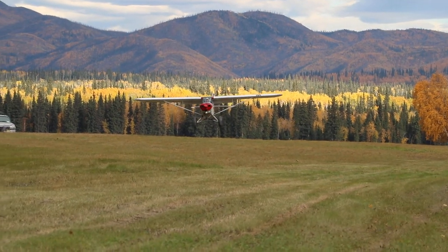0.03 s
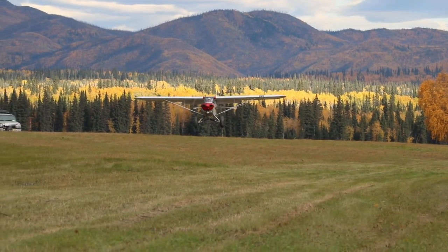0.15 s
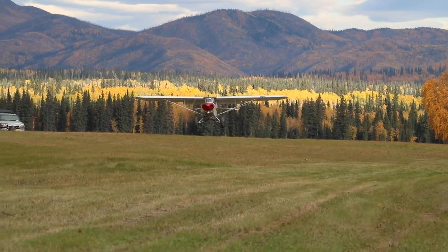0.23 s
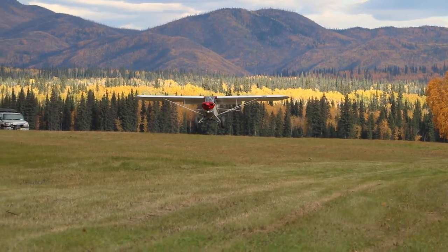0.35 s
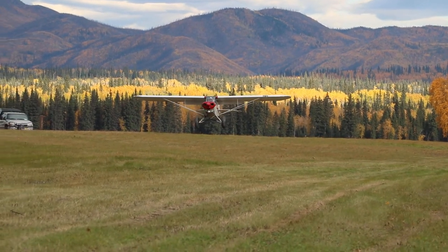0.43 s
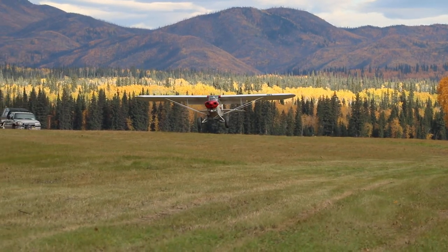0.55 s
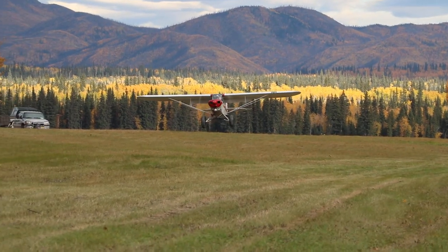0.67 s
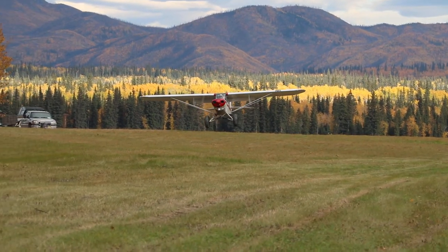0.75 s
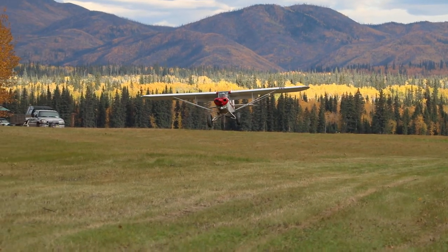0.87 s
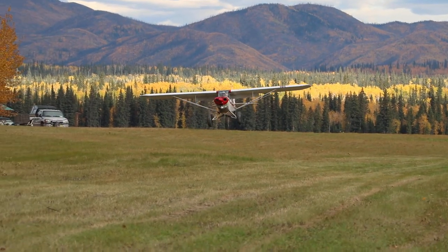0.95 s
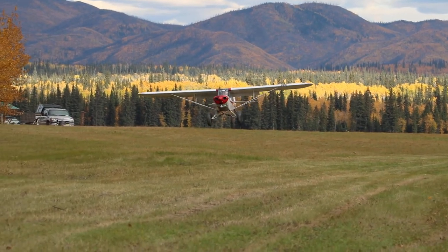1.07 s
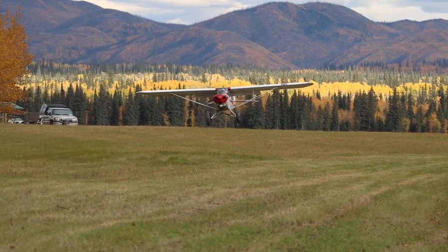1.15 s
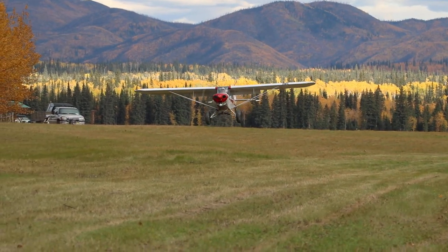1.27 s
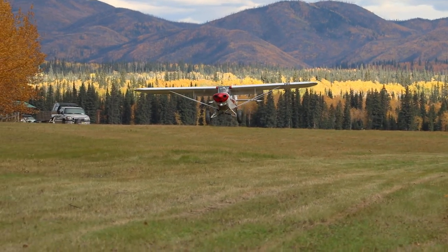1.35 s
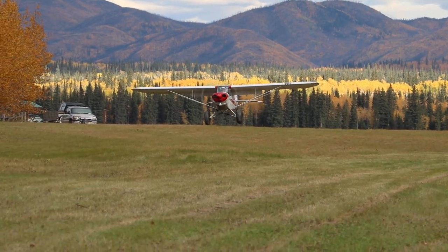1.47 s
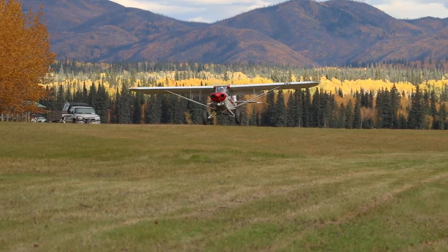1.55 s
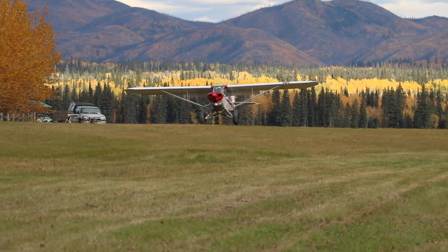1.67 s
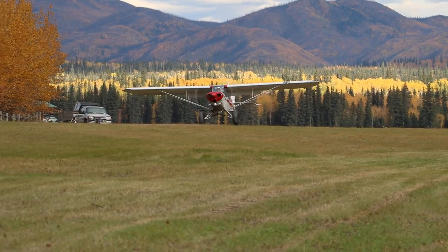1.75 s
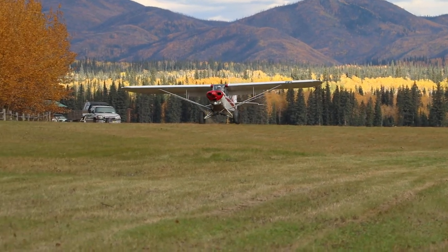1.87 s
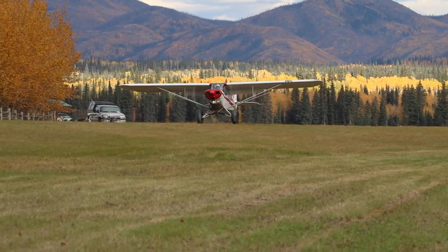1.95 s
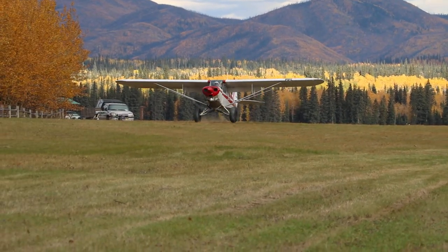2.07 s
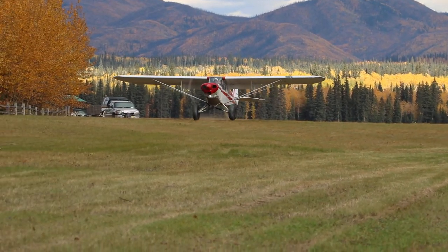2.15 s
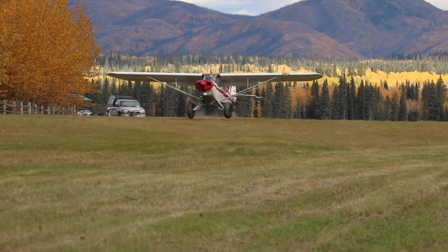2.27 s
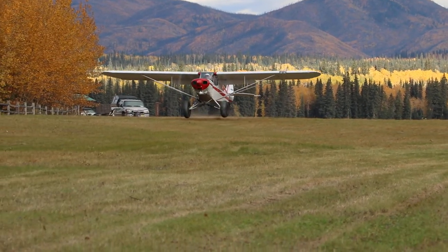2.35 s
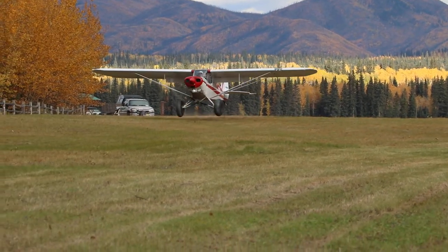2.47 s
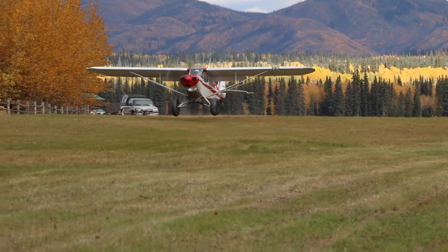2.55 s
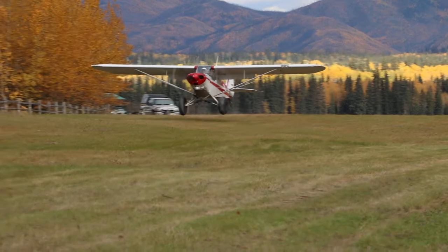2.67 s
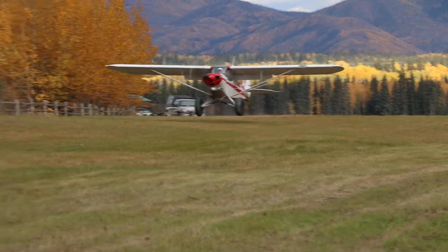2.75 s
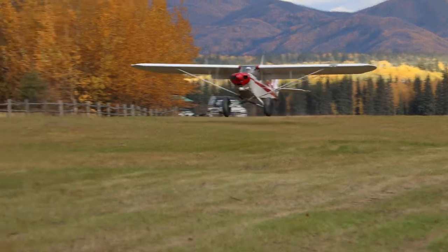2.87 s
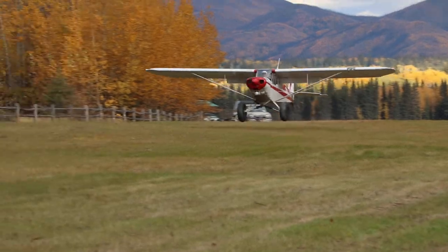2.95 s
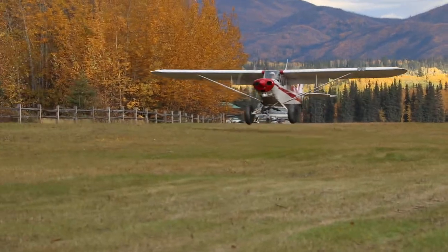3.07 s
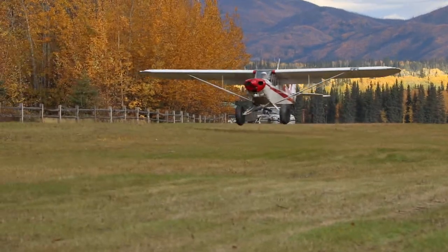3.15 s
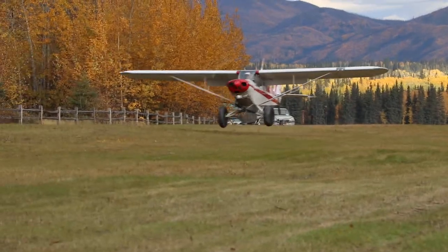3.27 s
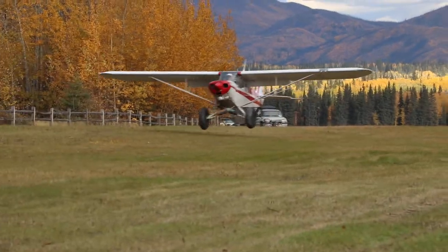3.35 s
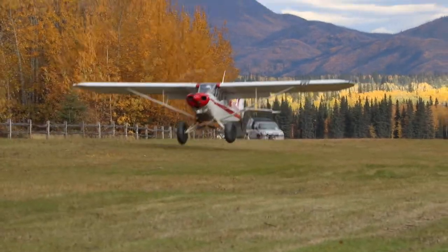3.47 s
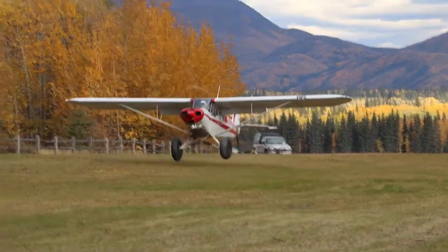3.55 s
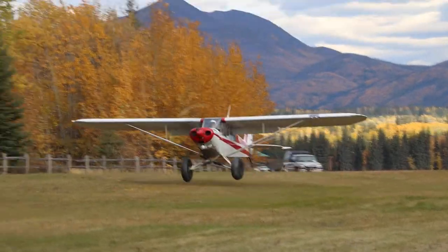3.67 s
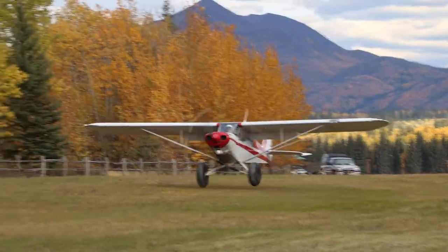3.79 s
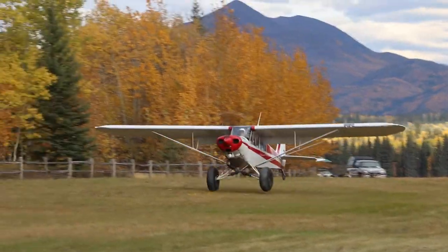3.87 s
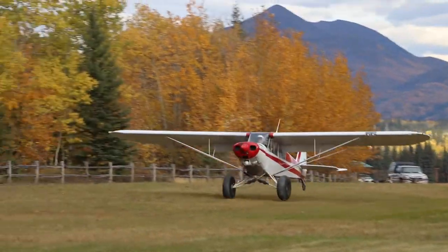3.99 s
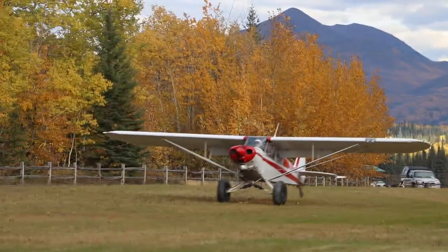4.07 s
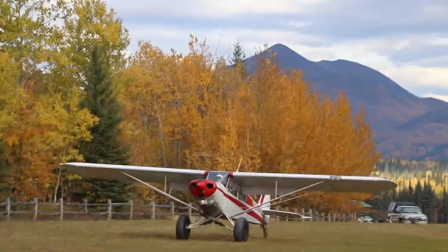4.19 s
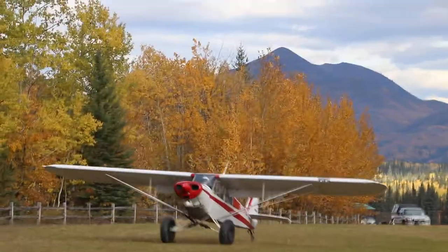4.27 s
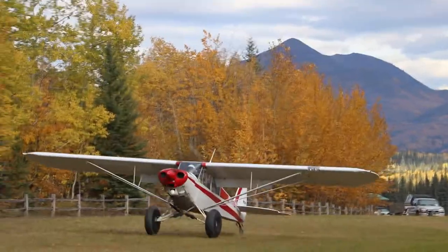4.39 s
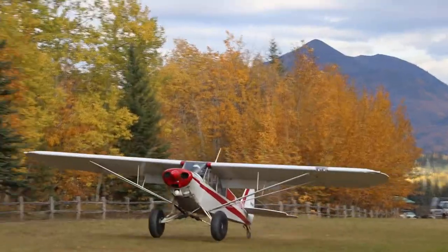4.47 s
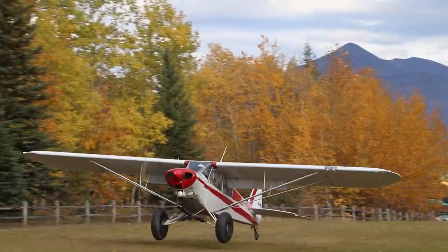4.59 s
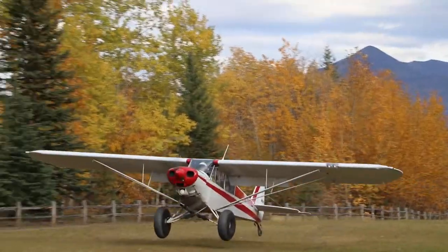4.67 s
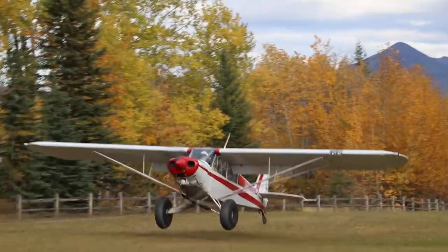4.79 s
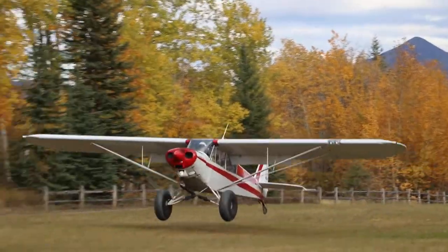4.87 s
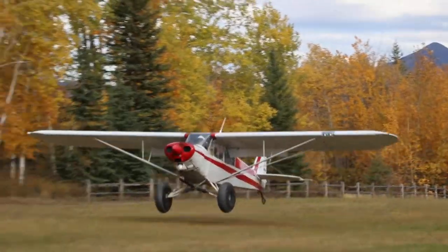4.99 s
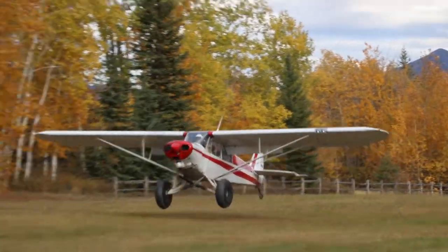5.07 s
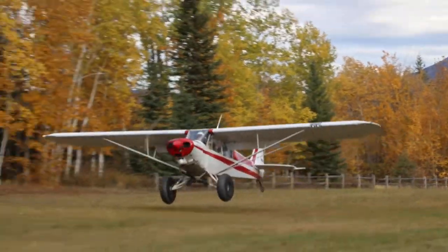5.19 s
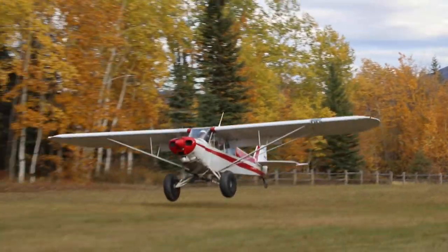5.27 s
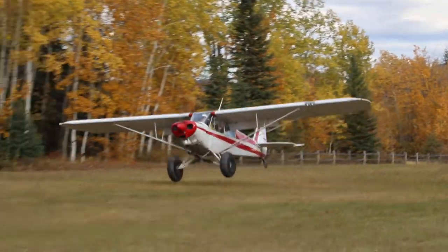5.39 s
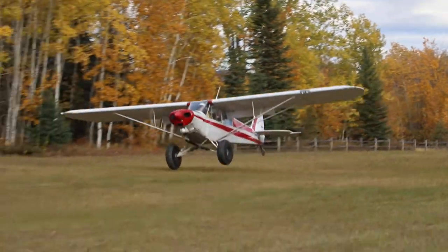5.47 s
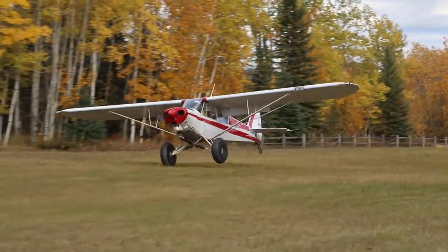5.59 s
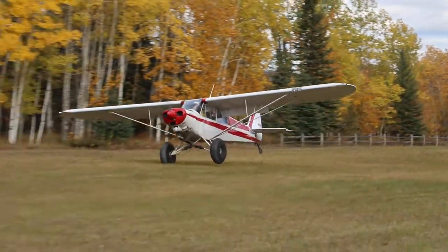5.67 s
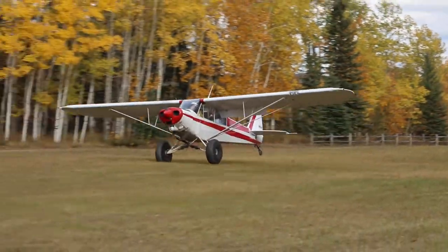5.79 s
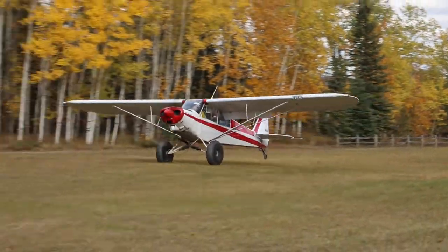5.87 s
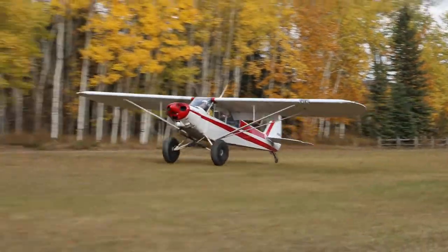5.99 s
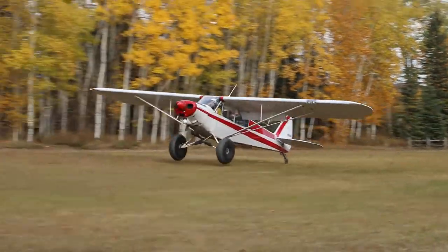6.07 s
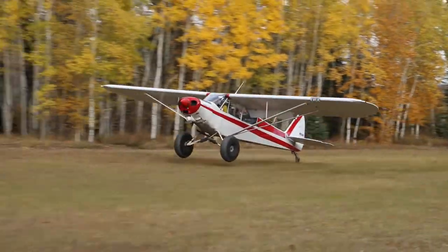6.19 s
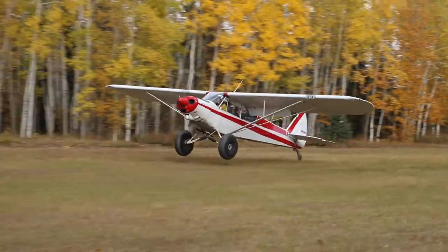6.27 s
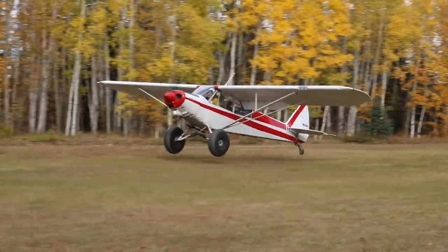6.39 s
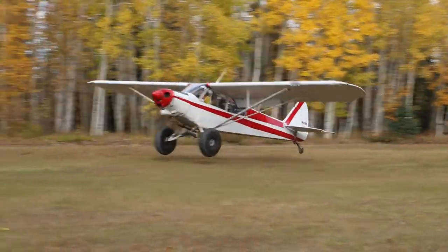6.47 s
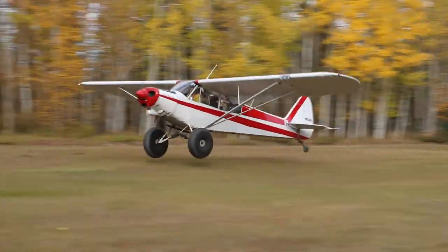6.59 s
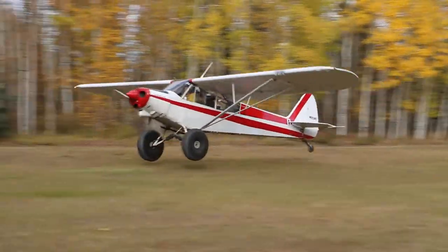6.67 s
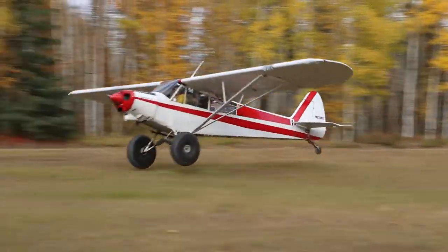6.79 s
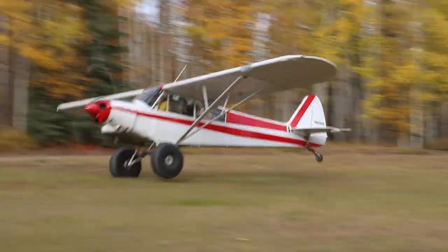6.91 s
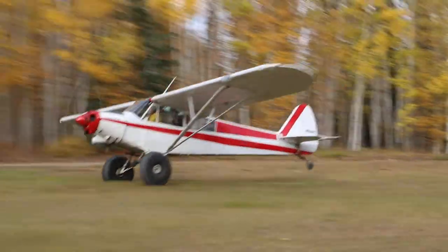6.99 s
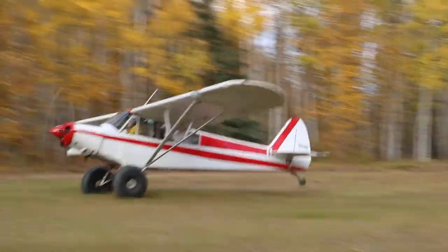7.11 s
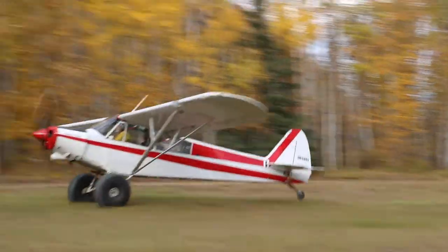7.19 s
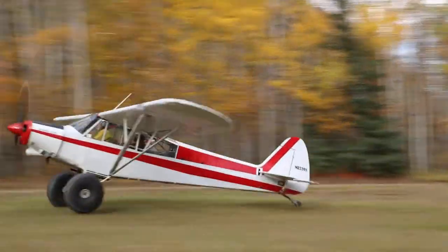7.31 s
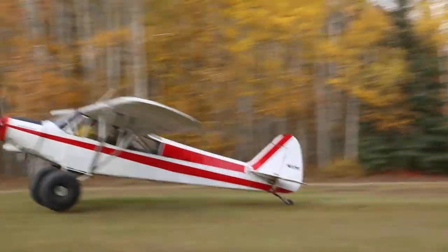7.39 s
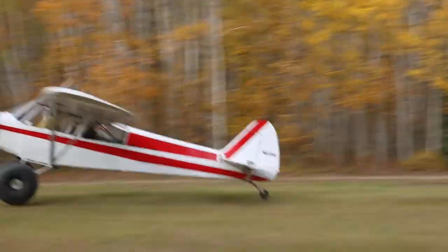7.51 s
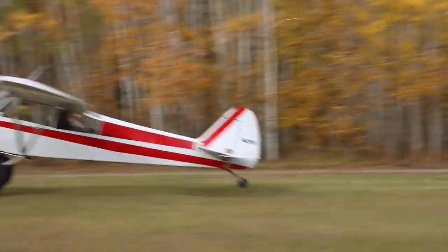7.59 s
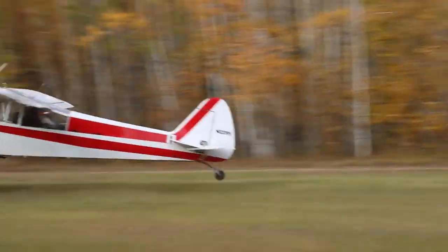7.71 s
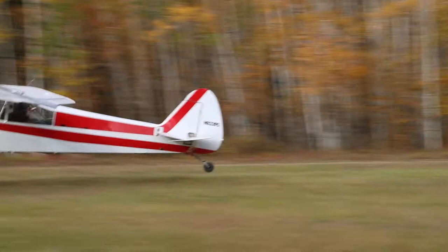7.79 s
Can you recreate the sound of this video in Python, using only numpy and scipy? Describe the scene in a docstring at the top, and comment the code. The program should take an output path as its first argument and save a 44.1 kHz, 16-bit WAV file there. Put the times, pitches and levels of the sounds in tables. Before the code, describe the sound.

Outdoors by a grass strip, a light piston plane glides in at idle with a lumpy, slightly stumbling low drone. The airy propeller hiss grows from faint to loud, a few dry clicks sound midway, then tyres thud and scrub softly on grass as it passes close, the pitch sinking. Faint rustling leaves surround it. A fixed stereo microphone stands beside the strip.

```python
"""The exhaust of a light four-cylinder plane drones and lopes as it glides in at idle and rolls past close by.
It is a stack of tones, ten engine cycles a second sinking to eight, plus puffs of noise; some firings stumble.
The propeller and the air round the airframe hiss: filtered noise, chopped ever harder as the plane comes abreast.
Low noise rumbles, noise bursts make the tyres thud on the grass, and narrow noise whistles on the struts.
Soft noise makes leaves rustle round the field, and short fading bursts make a few clicks and knocks."""
import sys
import numpy as np
from scipy import signal
from scipy.fft import rfft, irfft, next_fast_len
from scipy.io import wavfile
from scipy.ndimage import uniform_filter1d

SR = 44100
rng = np.random.default_rng(int(sys.argv[2]) if len(sys.argv) > 2 else 0)


def unload_wav(signal):
    """Save mono or channel-first audio to the path in sys.argv[1] as 16-bit WAV at rate SR, clipped to [-1, 1]."""
    wavfile.write(
        sys.argv[1],
        SR,
        np.round(np.clip(np.atleast_2d(signal).T, -1, 1) * 32767).astype(np.int16),
    )


N = 346185
TIME = np.arange(N) / SR
SIZE = next_fast_len(N + 4096, real=True)  # padded length for filtering
FREQS = np.fft.rfftfreq(SIZE, 1 / SR)
TOP_HZ = 15900  # nothing is heard above this

# engine cycles (two shaft turns, four firings) as heard, Doppler included: time_s, cycles_per_s
ENGINE_CYCLES = [(0, 10.148), (1.116, 10.046), (2.867, 9.329), (4.034, 9.235), (5.562, 8.768),
                 (6.117, 8.817), (7.193, 8.413), (7.85, 8.009)]
# exhaust tones: multiple_of_cycle_rate, far_db, approach_db, close_db
EXHAUST_TONES = [(4, -19, -23, -26), (5, -22, -27, -29), (6, -15, -20, -24), (7, -7, -12, -18),
                 (8, -1, -2, 0), (9, -18, -21, -20), (10, -16, -21, -23), (11, -13, -21, -14),
                 (12, -5, -9, -5), (13, -19, -18, -19), (14, -11, -15, -22), (15, -1, -8, -13),
                 (16, -1, -3, -7), (17, 0, 0, -4), (18, -18, -9, -13), (19, -17, -9, -9),
                 (20, -8, -11, -14), (21, -8, -4, -7), (22, -16, -9, -9), (23, -19, -16, -14),
                 (24, -14, -14, -11), (25, -21, -20, -9), (26, -25, -18, -11), (27, -17, -13, -11),
                 (28, -25, -22, -19), (29, -27, -18, -11), (30, -33, -26, -19), (31, -31, -25, -15),
                 (32, -35, -29, -24), (33, -35, -32, -18)]
# the four uneven firings of a cycle, at three stages: place_in_cycle (0-1), strength (no unit)
FIRINGS_FAR = [(.148, 1), (.407, .2), (.624, .55), (.896, .4)]
FIRINGS_APPROACH = [(.15, .66), (.445, .69), (.604, .54), (.9, .52)]
FIRINGS_CLOSE = [(.091, .57), (.446, .7), (.662, .55), (.911, .95)]
# how the exhaust's boom, drone and bark carry, a row each:
# abreast_db, loss_db_per_doubling_of_distance, gain_ahead_of_nose_db, floor_db
EXHAUST_REACH = [(-20, 7.5, 5.5, -48), (-22, 7, 10.5, -38), (-38.5, 15.5, 23.5, -61)]
# the drone slowly swells and sinks: middle_s, half_length_s, change_db
DRONE_SWELLS = [(.3, 0.59, -4), (2.35, 0.36, 2.5), (5, 0.79, -1.3), (6.25, 0.22, 0.5)]
# weak firings: middle_s, share_of_drone_lost (0-1), puff_db before the low cut
STUMBLES = [(1.33, 0.44, -36), (1.689, 0.13, -27), (2.279, 0.21, -27), (2.47, 0.62, -20),
            (2.862, 0.22, -23), (3.329, 0.12, -19), (4.086, 0.18, -19), (4.411, 0.21, -26),
            (4.86, 0.66, -24), (5.301, 0.07, -14), (7.14, 0.12, -11), (7.50, 0.2, -36), (7.75, 0.36, -27)]
# the plane's nearness along its run: metres_to_go_m,
# stage (0 far off, 1 on approach, 2 near, 3 close by, 4 abreast)
STAGES = [(112.5, 0), (94.2, .5), (79, 1.44), (58.3, 1.56), (45.6, 2.5), (30.4, 2), (19.5, 3), (7.04, 3.5),
          (2, 4)]
# colour of the air noise at each stage: pitch_hz, relative_level_db per Hz
AIR_FAR = [(260, -34), (450, 11.5), (643, 1.5), (736, 1), (879, 1), (920, -2), (1010, 0.5), (1350, -8),
           (1460, -7), (2050, -10), (2210, -9), (2530, -12.5), (3960, -3), (8580, -16), (15800, -41)]
AIR_APPROACH = [(260, -41), (450, -4), (580, 1.5), (693, -4.5), (920, -0.5), (1120, -4.5), (1370, -0.5),
                (2380, 1), (3160, -3.5), (3730, -7), (4660, -5), (6000, -16), (9110, -26), (13400, -40),
                (15800, -47)]
AIR_NEAR = [(260, -29), (450, -16), (546, -8), (673, -16.5), (841, -11), (1170, -11), (1370, 1.5),
            (2770, 3), (3780, -13), (5020, -9), (7970, -17), (9380, -24), (10600, -24), (14400, -42),
            (15800, -45)]
AIR_CLOSE = [(260, -33), (450, 0.5), (725, -7.5), (947, -0.5), (1150, -5), (1530, 1.5), (2570, -3.5),
             (3070, -4), (5250, -2.5), (5830, -4.5), (8210, -6), (11700, -16.5), (14400, -20), (15800, -30)]
AIR_ABREAST = [(260, -41), (450, -9), (683, -15.5), (1040, -8.5), (1180, -14), (1480, -2.5), (1640, -10.5),
               (2250, -11), (3030, -13), (5100, -14), (7180, -23), (8580, -19), (12500, -28.5),
               (14400, -29), (15800, -27.5)]
# narrow resonances of the airframe in the air noise: pitch_hz, width_hz, boost_db
AIRFRAME_RESONANCES = [(1126, 52, 2), (1760, 54, 1), (2360, 67, 1.5), (5200, 230, 2), (8100, 250, 0.5)]
# how the air's rush, hiss, sizzle and fizz carry, a row each:
# abreast_db, loss_db_per_doubling_of_distance, gain_ahead_of_nose_db, floor_db
AIR_REACH = [(-35, 8.4, 4.5, -55.5), (-32, 11, 14, -87), (-33.5, 11.5, 12, -58.5), (-38.5, 18, 16.5, -66)]
# the air noise swells and sinks: middle_s, half_length_s, hiss_db, sizzle_db, fizz_db
AIR_SWELLS = [(1.4, 0.34, -1.8, -1.2, -.2), (1.87, .15, 1, 0, 1.5), (2.48, 0.31, 3, 2, -0.5),
              (3.15, 0.28, 1, -1, -2.5), (3.62, 0.25, 3, 6.5, -3), (4.8, 0.31, 2.3, 1.7, 1),
              (5.68, 0.14, -2.3, -0.7, 0), (6.38, 0.14, .5, 0.9, 0.5), (7.1, 0.32, -1.5, -1.8, 0),
              (7.6, 0.29, 0.5, -2.2, 2.2)]
# the chop deepens as the propeller's disc sweeps past: middle_s, half_length_s, extra_chop_db
CHOP_PEAK = [(7.69, .15, 4.2)]
# clicks and knocks: start_s, level_db before colouring, ring_time_s (to fall 60 dB), brightness_hz
CLICKS = [(4.035, -28, .035, 1000), (4.1203, -9, .011, 5000), (4.1272, -17, .022, 6500),
          (4.129, -26, .035, 900), (4.453, -20.5, .026, 1000), (7.3065, -26, .008, 12000),
          (7.4155, -12.5, .022, 5500), (7.652, -12, .014, 2800)]
# colour of the clicks: pitch_hz, level_db
CLICK_COLOUR = [(100, -16), (300, 0), (700, -3.5), (1600, -1.5), (2350, 3), (3200, -4), (4500, -10),
                (5500, -6), (7800, 0), (10000, -3), (16000, 0)]
# the fat tyres meet the grass: start_s, contact_s, thud_db, scrub_db
TOUCHDOWNS = [(5.86, 0.21, -26.5, -30.5), (7.078, 0.14, -19.5, -28), (7.3, 0.23, -28, -30),
              (7.78, .1, -35, -31.5)]
# the air whistles on the struts: middle_s, half_length_s, level_db
WHISTLES = [(6.963, 0.066, -33), (7.486, 0.13, -32.5), (7.752, 0.21, -35.5)]

# waver of the exhaust tones far off, half as much again close by (share of the level, and radians):
# the firing tones (every fourth multiple), and the weaker tones between them
WAVER_FIRING, WAVER_WEAK = .07, .13
# the straight run: speed, distance from the microphone when abreast, and that moment
SPEED_M_PER_S, PASS_M, ABREAST_S = 15, 15, 7.7
# blade chop close by, before each band takes its share, and the distance that halves it
CHOP_DB, CHOP_M = 2.5, 66
# left-right likeness of the air noise (0-1) when abreast, and its loss per metre
SAME_CLOSE, SAME_LOSS_PER_M = 0.91, .0068
# the treble's lean to the left, before each band's own offset: per hundred metres, and added abreast
LEFT_DB_PER_100_M, LEFT_ABREAST_DB = 6, 4


def amp(db):
    """Turns decibels into gain."""
    return 10 ** (np.asarray(db) / 20)


def unit(x):
    """Scales a sound to an average (rms) level of one."""
    return x / np.sqrt(np.mean(x ** 2) + 1e-20)


def curves(rows):
    """Draws each column of a table as a curve over time."""
    time_s, *columns = np.transpose(rows)
    return [np.interp(TIME, time_s, column) for column in columns]


def bumps(rows):
    """Adds up smooth humps (middle, half length, heights), one curve for each column of heights."""
    middle_s, half_s, *heights = np.transpose(rows)
    humps = np.exp(-((TIME - middle_s[:, None]) / half_s[:, None]) ** 2)
    return np.array(heights) @ humps


def colour(points):
    """Draws a gain for every frequency through a few points."""
    hz, db = np.transpose(points)
    return amp(np.interp(np.log(FREQS + 1), np.log(hz), db))


def lowpass(hz, order=8):
    """Gain that keeps the frequencies below hz and halves the level there."""
    return 1 / (1 + (FREQS / hz) ** order)


def shaped(x, gain):
    """Filters a sound by a gain for every frequency."""
    return irfft(rfft(x, SIZE) * gain, SIZE)[..., :N]


def drift(per_s):
    """Wanders at random, with an rms of about one, turning per_s times a second."""
    knots = rng.standard_normal(1024)
    return np.interp(TIME * per_s, np.arange(1024), knots) * np.sqrt(3 / 2)


def swell(x, gain, db):
    """Picks one band of a sound and brings it to a level curve."""
    band = shaped(x, gain)
    # average power over 0.3 s, so quicker changes survive
    power = uniform_filter1d(np.atleast_2d(band ** 2).mean(0), size=13230)
    return band * amp(db) / np.sqrt(abs(power) + 1e-14)


def add(mix, start_s, sound):
    """Mixes a sound in at a given time."""
    part = mix[..., round(start_s * SR):][..., :sound.shape[-1]]
    part += sound[..., :part.shape[-1]]


def flight():
    """Gives metres to go, distance in metres, and how squarely the nose or tail points at us (0-1)."""
    to_go = SPEED_M_PER_S * (ABREAST_S - TIME)
    distance = np.hypot(to_go, PASS_M)
    return to_go, distance, (to_go / distance) ** 2


def carried(reach):
    """Level of each band in dB: it falls with distance, is thrown along the run, and rests on a floor."""
    _, distance, ahead = flight()
    doublings = np.log2(distance / PASS_M)
    levels = []
    for abreast_db, loss_db, gain_db, floor_db in reach:
        direct = amp(abreast_db - loss_db * doublings + gain_db * ahead)
        levels.append(20 * np.log10(np.hypot(direct, amp(floor_db))))
    return levels


def firing_phase(k, firings, smear):
    """Phase of one multiple of the cycle rate: four pulses, smeared by the pipe round its resonance."""
    places, strengths = np.transpose(firings)
    pulses = np.sum(strengths * np.exp(-2j * np.pi * k * places))
    return np.angle(1j * pulses) + smear * (k - 16) ** 2


def exhaust_tones(cycle, stage, near):
    """Uneven firings repeat every cycle, so they ring at whole multiples of the cycle rate."""
    aspect = np.interp(stage, [0, .9, 1.3, 2.3], [0, 1, 1, 2])  # 0 far, 1 approach, 2 close
    tone = np.zeros(N)
    for k, *levels_db in EXHAUST_TONES:
        k = round(k)
        phases = [firing_phase(k, FIRINGS_FAR, 0),
                  firing_phase(k, FIRINGS_APPROACH, .008),
                  firing_phase(k, FIRINGS_CLOSE, .02)]
        level = amp(np.interp(aspect, [0, 1, 2], levels_db))
        phase = np.interp(aspect, [0, 1, 2], np.unwrap(phases))
        waver = (WAVER_FIRING if k % 4 == 0 else WAVER_WEAK) * (1 + near / 2)
        angle = 2 * np.pi * k * cycle + phase + waver * drift(7.7)
        tone += level * (1 + waver * drift(8)) * np.cos(angle)
    return tone


def exhaust_puffs(cycle, near, lope=0.31, lope_at=0.71):
    """Each firing blows a turbulent puff down the pipe; close by, one cylinder puffs hardest."""
    since_firing = (4 * (cycle - .15)) % 1
    puffs = rng.standard_normal(N) * np.exp(-since_firing / .5)
    puffs = puffs * (1 + lope * near * np.cos(2 * np.pi * (cycle - lope_at)))
    pipe = colour([(20, -40), (45, -16), (65, -3), (110, -6), (170, -5.0), (250, -1.0), (305, -8),
                   (352, -4.5), (410, -9.5), (480, -10), (530, -18), (700, -34), (1500, -59)])
    return unit(shaped(puffs, pipe))


def exhaust(cycle, stage, burble_db=-22, burble_near_db=8):
    """Firings ring the pipe; far off one cylinder thumps, close by all four speak and burble."""
    near = np.clip((stage - .5) / 2.3, 0, 1)
    burble = amp(burble_db + burble_near_db * near) * exhaust_puffs(cycle, near)
    sound = exhaust_tones(cycle, stage, near) + burble
    boom_db, drone_db, bark_db = carried(EXHAUST_REACH)
    drone_db = drone_db + bumps(DRONE_SWELLS)[0]
    low, middle = lowpass(115, order=16), lowpass(279.0, order=20)
    boom = swell(sound, low, boom_db)
    drone = swell(sound, middle - low, drone_db)
    bark = swell(sound, 1 - middle, bark_db)
    return boom + drone + bark


def air(cycle, stage, blade_at=0.19, flicker_db=0.9, grain_db=1.1, hiss_pan_db=-2.0):
    """Turbulent noise changes colour with nearness and swishes at each of four blade passes a cycle."""
    _, distance, ahead = flight()
    chop_db = CHOP_DB / (1 + (distance / CHOP_M) ** 4) * (1 + .5 * drift(35)) + bumps(CHOP_PEAK)[0]
    same = np.clip(SAME_CLOSE - SAME_LOSS_PER_M * (distance - PASS_M), 0, 1)
    pan_db = LEFT_DB_PER_100_M * distance / 10 ** 2 + LEFT_ABREAST_DB * (1 - ahead) ** 2
    # noise shared by both ears, plus noise of each ear's own
    noise = np.sqrt(same) * rng.standard_normal(N) + np.sqrt(1 - same) * rng.standard_normal((2, N))
    boost_db = sum(db / (1 + ((FREQS - hz) / width) ** 2) for hz, width, db in AIRFRAME_RESONANCES)
    noise = shaped(noise, amp(boost_db))
    # fade from each stage's colour to the next
    colours = [AIR_FAR, AIR_APPROACH, AIR_NEAR, AIR_CLOSE, AIR_ABREAST]
    noise = sum(np.maximum(1 - abs(stage - k), 0) * unit(shaped(noise, colour(points)))
                for k, points in enumerate(colours))
    blade = 8 * np.pi * (cycle - blade_at)
    swish_db = chop_db * (np.cos(blade) - 0.24 * np.sin(2 * blade))  # quick rise, slower fall

    def band(gain, db, chop, left_db):
        """One size of eddy, with its own flicker; the far hiss is smoother."""
        grain = unit(uniform_filter1d(rng.standard_normal(N), size=60))
        gusts_db = flicker_db * drift(45) + grain_db * grain
        level = swell(noise * amp(chop * swish_db + same * gusts_db), gain, db)
        return level * amp(np.array([[.5], [-.5]]) * left_db)

    rush_db, *treble_db = carried(AIR_REACH)
    hiss_db, sizzle_db, fizz_db = treble_db + bumps(AIR_SWELLS)
    a, b, c, d = [lowpass(hz, order=12) for hz in (492, 1270, 3020, 7630)]
    # the treble is chopped the deepest
    rush = band(b - a, rush_db, 0.083, 0.64)
    hiss = band(c - b, hiss_db, 0.31, hiss_pan_db)
    sizzle = band(d - c, sizzle_db, 0.75, pan_db - 1.7)
    fizz = band(1 - d, fizz_db, 1.04, pan_db + 0.5)
    # louder where the two ears are less alike
    return (rush + hiss + sizzle + fizz) * np.sqrt(2 / (1 + same))


def ports(x, stage):
    """The two microphone ports hear the treble out of step, most of all with the plane abreast."""
    turn = np.interp(FREQS, [0, 1200, 2000, 3200, 4200, 5300, 7000, 9000, 16000],
                     [0, -0.2, 0.018, 1.3, 0.3, -1.1, 0.79, 0.6, 0.33])  # radians between the ports
    halves = .5j * np.array([[1], [-1]])
    ahead = shaped(x, np.exp(halves * turn))
    abreast = shaped(x, np.exp(halves * (turn + FREQS / 7000)))
    passing = np.clip(stage - 3, 0, 1)
    return ahead * (1 - passing) + abreast * passing


def buffet(stage, far_db=-58, growth_db=5.5):
    """Disturbed air makes a low rumble that grows as the plane nears."""
    rumble = colour([(8, -30), (22, -26), (35, 0), (52, 0), (90, -7), (200, -51)])
    return amp(far_db + growth_db * stage) * unit(shaped(rng.standard_normal(N), rumble))


def field(level_db=-54):
    """Wind in the trees all round is steady soft noise, unrelated in the two ears."""
    leaves = colour([(15, -12), (50, 4), (150, -0.5), (350, 1.5), (600, -3), (1200, -33),
                     (5000, -19), (10000, -19.5), (16000, -27)])
    return amp(level_db) * unit(shaped(rng.standard_normal((2, N)), leaves))


def tree_echo(engine, delay_s=.13, level_db=-26.5):
    """The tree line returns a faint late copy from the side, opposite in the two ears."""
    late = np.interp(TIME - delay_s, TIME, engine, left=0)
    return amp(level_db) * late * np.array([[1], [-1]])


def stumble(drone, puff_hz=60, puff_s=0.0098, gap_s=0.027, pipe_low_hz=44):
    """A weak firing leaves a hole in the drone and a soft low puff; the pipe loses the deepest bass."""
    for middle_s, share, puff_db in STUMBLES:
        u = TIME - middle_s
        hole = 1 - share * np.exp(-(u / gap_s) ** 2)
        puff = amp(puff_db) * np.exp(-(u / puff_s) ** 2) * np.sin(2 * np.pi * puff_hz * u)
        drone = drone * hole + puff
    return shaped(drone, 1 - lowpass(pipe_low_hz, order=6))


def clicks(same=0.4):
    """Short dry knocks, dull or bright, are bursts of noise that die away quickly."""
    out, t = np.zeros((2, N)), np.arange(2048) / SR
    for start_s, level_db, ring_s, bright_hz in CLICKS:
        burst = np.sign(rng.standard_normal((2, len(t))) + same * rng.standard_normal(len(t)))
        dulling = signal.butter(2, min(bright_hz, SR / 3), fs=SR, output="sos")
        burst = signal.sosfilt(dulling, burst)
        add(out, start_s, amp(level_db - 60 * t / ring_s) * unit(burst))
    return shaped(out, colour(CLICK_COLOUR))


def tyres(attack_s=0.045, release_s=0.084):
    """At each contact the tyres thud hollowly and scrub over the grass."""
    hollow = colour([(80, -39), (150, -8), (215, -0.5), (255, -12), (300, -24), (600, -63)])
    grass = colour([(180, -15), (290, -3.5), (350, 2), (460, 0.5), (640, -24.5), (1000, -10), (3000, -45)])
    thud = unit(shaped(rng.standard_normal(N), hollow))
    scrub = unit(shaped(rng.standard_normal(N), grass))
    out = np.zeros(N)
    for start_s, contact_s, thud_db, scrub_db in TOUCHDOWNS:
        press = np.clip((TIME - start_s) / attack_s, 0, 1)
        lift = np.exp(-np.maximum(TIME - start_s - contact_s, 0) / release_s)
        out += press * lift * (amp(thud_db) * thud + amp(scrub_db) * scrub)
    return out


def whistle(rate, multiple=184, width_hz=35):
    """A narrow band of eddy noise sinks in step with the engine's note as the plane goes by."""
    level, = bumps([(middle_s, half_s, amp(db)) for middle_s, half_s, db in WHISTLES])
    eddies = shaped(rng.standard_normal((2, N)), lowpass(width_hz, order=2))
    turn = 2 * np.pi * np.cumsum(multiple * rate) / SR
    return level * unit(eddies[0] * np.cos(turn) + eddies[1] * np.sin(turn))


def scene():
    """Puts the plane's exhaust, air noise and tyres over the quiet field."""
    rate, = curves(ENGINE_CYCLES)
    cycle = np.cumsum(rate) / SR  # engine cycles so far
    metres, stages = np.transpose(STAGES)
    stage = np.interp(-flight()[0], -metres, stages).clip(0, 4)
    engine = stumble(exhaust(cycle, stage))
    body = (engine + tyres()) * amp([[.27], [-.27]])  # a touch to the left
    plane = body + ports(air(cycle, stage), stage) + buffet(stage) + whistle(rate)
    return plane + tree_echo(engine) + field() + clicks()


def record(dry):
    """Cuts away everything from the top frequency up."""
    return shaped(dry, FREQS < TOP_HZ)


dry = scene()
out = record(dry)
unload_wav(out)
```